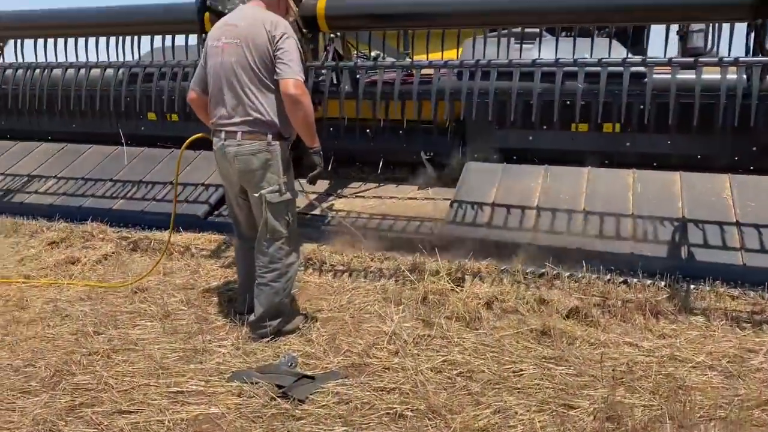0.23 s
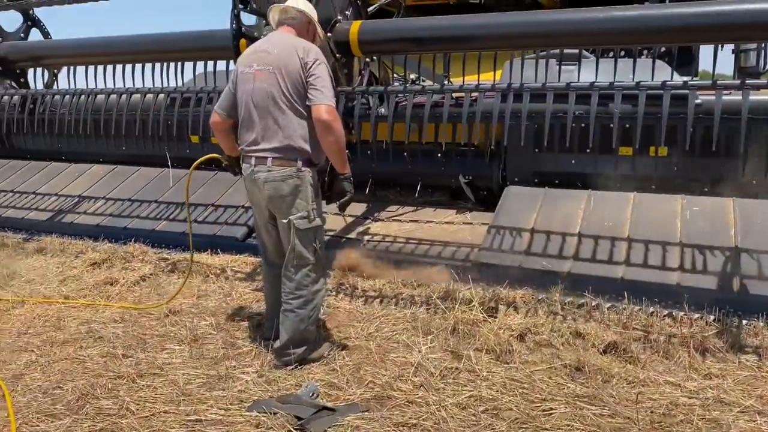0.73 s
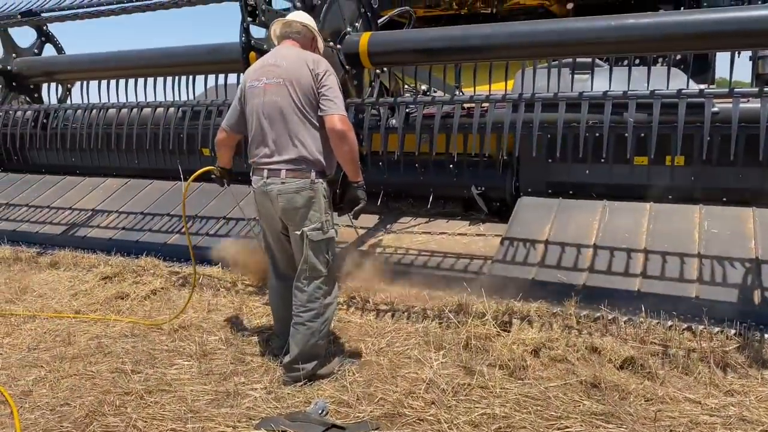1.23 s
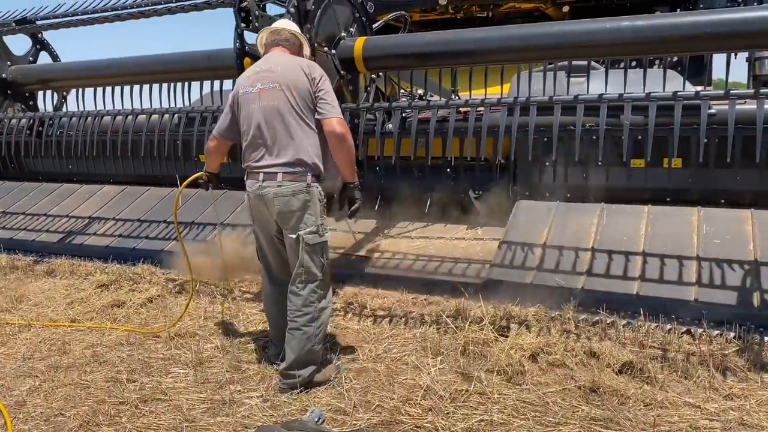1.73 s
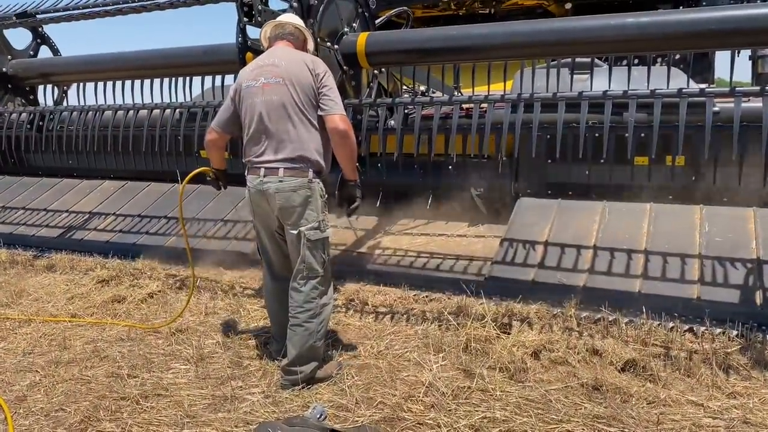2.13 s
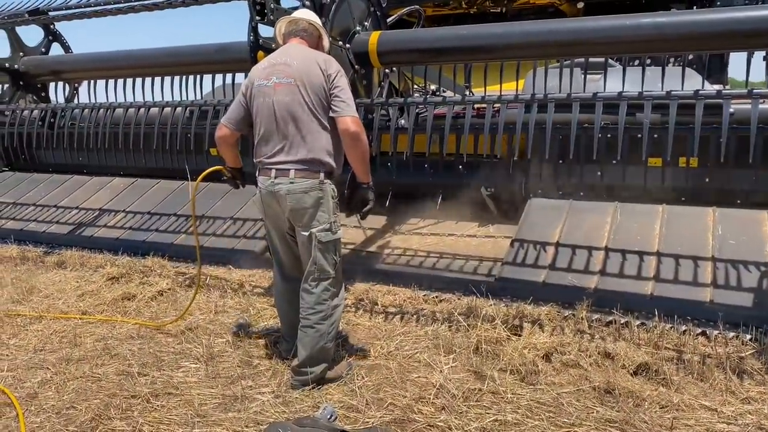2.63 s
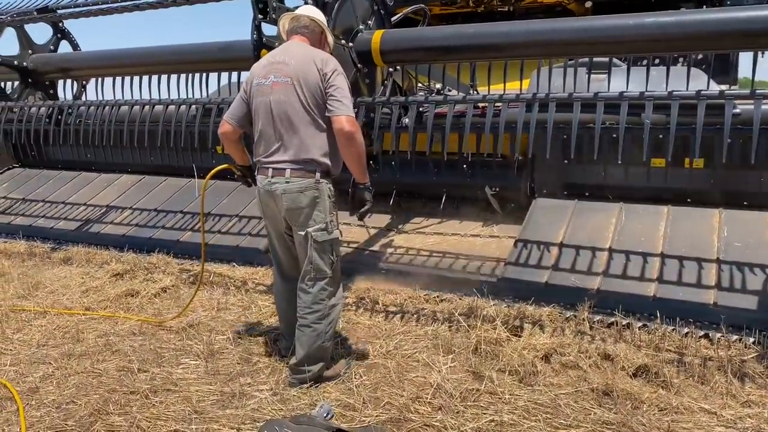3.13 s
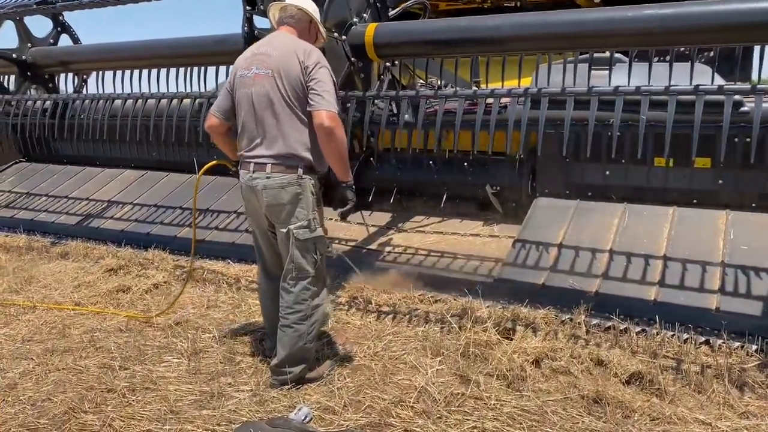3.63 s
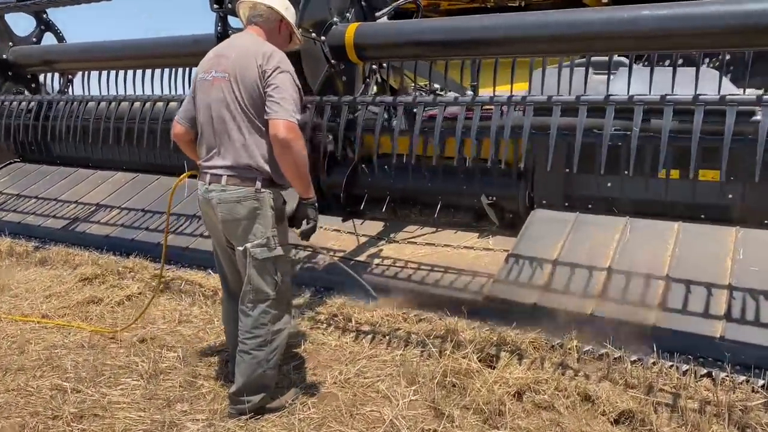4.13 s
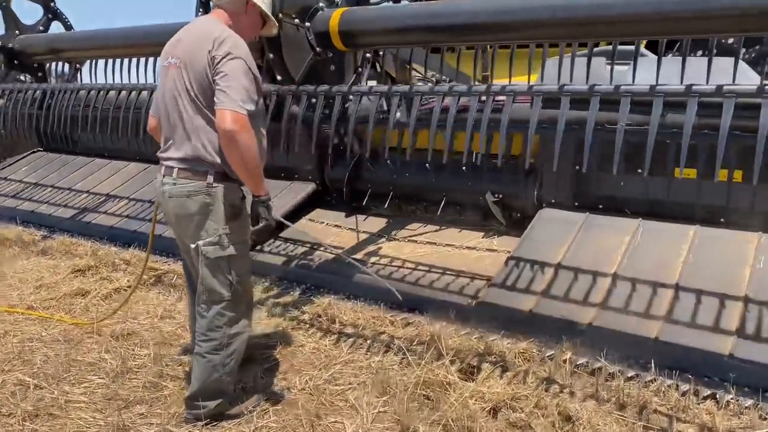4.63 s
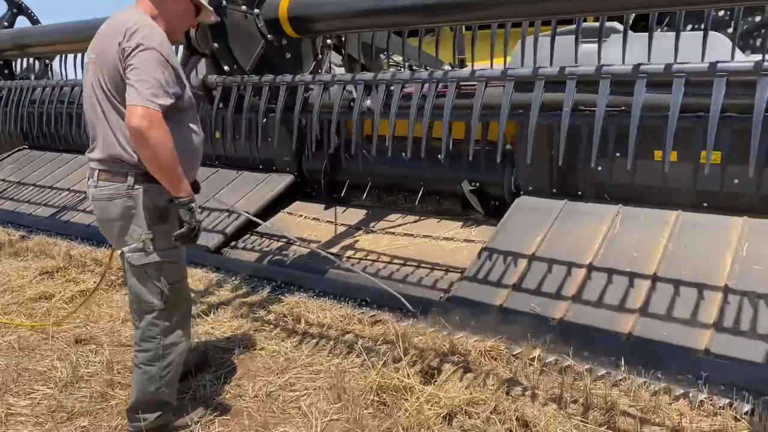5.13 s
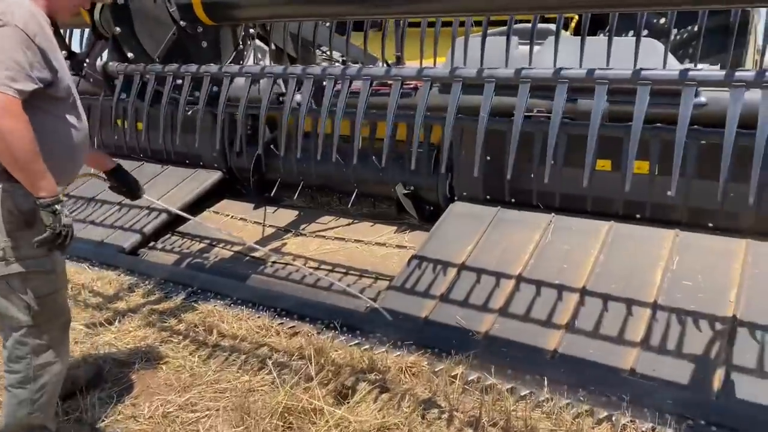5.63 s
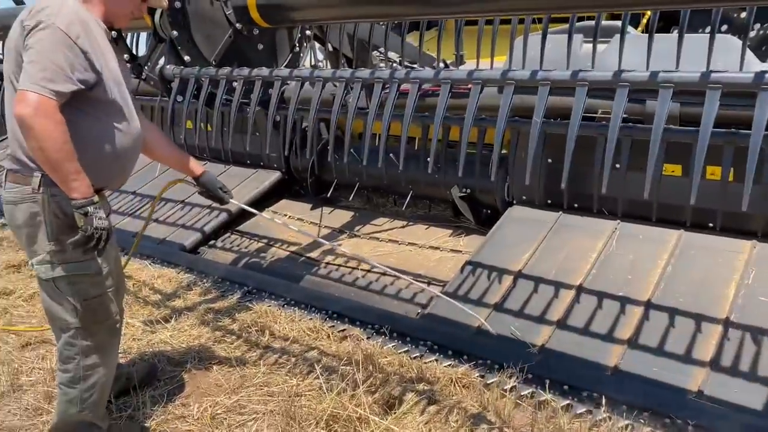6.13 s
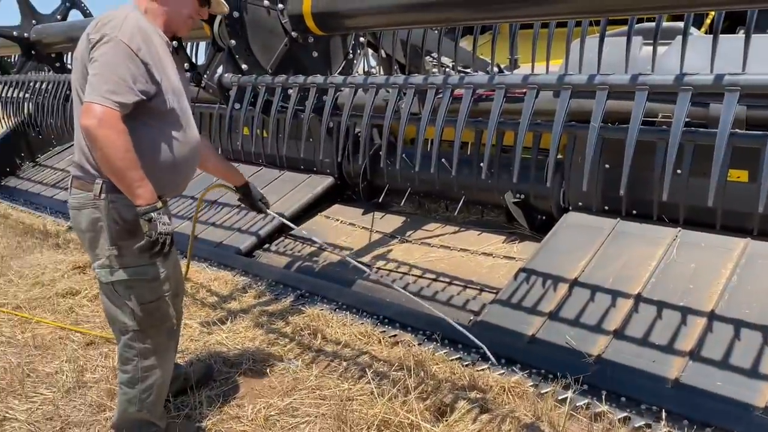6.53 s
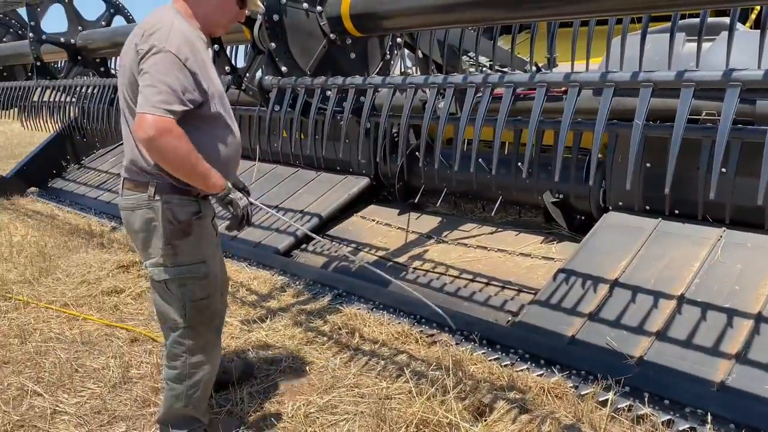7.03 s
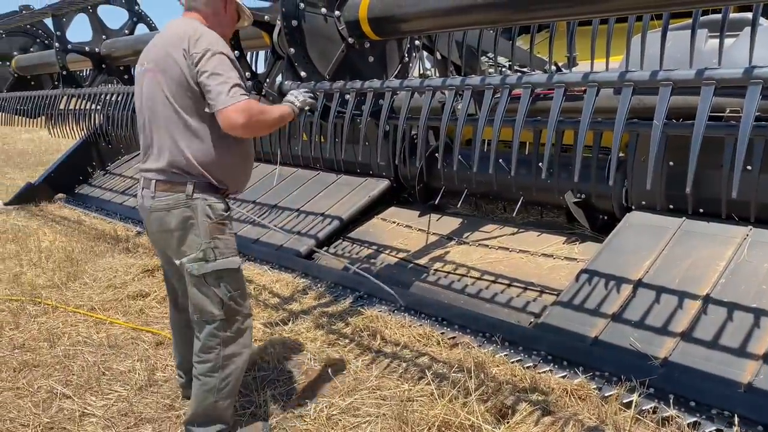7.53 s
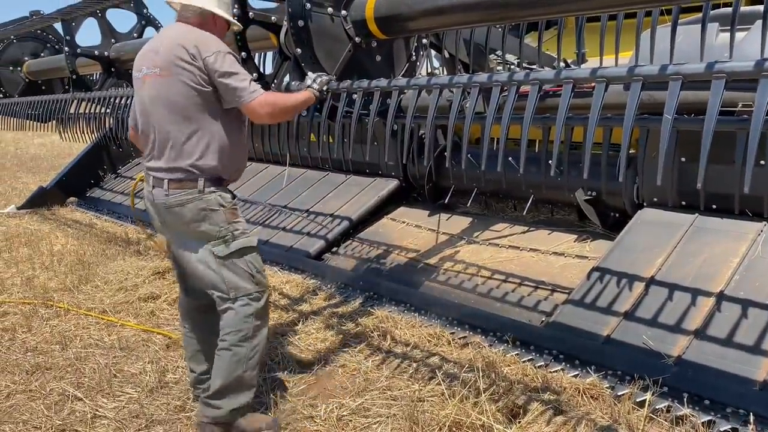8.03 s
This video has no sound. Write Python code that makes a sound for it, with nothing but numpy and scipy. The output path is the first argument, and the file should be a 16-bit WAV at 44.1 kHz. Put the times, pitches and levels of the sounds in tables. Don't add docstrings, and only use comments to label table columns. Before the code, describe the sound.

Outdoors in a field, a worker cleans a harvester header with compressed air. A bright hiss with a rougher roar beneath swells and dips as the nozzle sweeps over plates. A compressor drones to the left, fading after about three seconds. Wind buffets the small stereo microphone, and short spitting bursts come near the end.

```python
import sys
import numpy as np
from scipy import signal
from scipy.fft import rfft, irfft, next_fast_len
from scipy.io import wavfile
from scipy.ndimage import uniform_filter1d, map_coordinates

SR = 44100
rng = np.random.default_rng(int(sys.argv[2]) if len(sys.argv) > 2 else 0)


def digitize_waveform(pressure):
    field = np.atleast_2d(pressure).T
    bounded = np.clip(field, -1, 1)
    quanta = np.round(bounded * 32767).astype(np.int16)
    wavfile.write(sys.argv[1], SR, quanta)


def elevation(decibels):
    levels = np.asarray(decibels, float)
    return 10 ** (levels / 20)


N = 365148
USUAL_DB = -32


def unit(x):
    return x / np.sqrt(np.mean(x ** 2) + 1e-20)


def along(points, hz):
    f, v = np.transpose(points)
    return np.interp(np.log(hz + 1), np.log(f + 1), v)


def curves(rows):
    s, *cols = np.transpose(rows)
    return [np.interp(np.arange(N) / SR, s, c) for c in cols]


def swells(rows):
    s, half, *cols = np.transpose(rows)
    t = np.arange(0, N + 64, 64) / SR
    bells = np.exp(-((t[:, None] - s) / half) ** 2)
    return [np.interp(np.arange(N) / SR, t, bells @ c) for c in cols]


def wobble(rate):
    steps = np.arange(0, N + 64, 64)
    knots = rng.standard_normal(int(N * 200 / SR) + 8)
    coarse = map_coordinates(knots, [steps * min(rate, 200) / SR])
    return np.interp(np.arange(N), steps, coarse)


def filtered(x, response):
    m = next_fast_len(N + SR // 4)
    return irfft(rfft(x, m) * response(np.fft.rfftfreq(m, 1 / SR)), m)[..., :N]


def patchy(patchy_db):
    hz, t, z = signal.stft(rng.standard_normal((2, N)), SR, nperseg=512)
    field = rng.standard_normal(z.shape[1:])
    for axis in (0, 1):
        field = uniform_filter1d(field, size=8, axis=axis)
    at = np.minimum(np.round(t * SR).astype(int), N - 1)
    return hz[:, None], at, z * elevation(patchy_db * unit(field))


def sound(z):
    return signal.istft(z, nperseg=512)[1][:, :N]


def spread(pair, alike):
    turn = np.arccos(np.clip(alike, -1, 1)) / 2
    mid, side = pair[0] * np.cos(turn), pair[1] * np.sin(turn)
    return np.array([mid + side, mid - side])


def rush(spectrum, alike):
    def colour(hz):
        return spread(np.eye(2)[:, :, None], along(alike, hz)) * elevation(along(spectrum, hz))
    return filtered(sound(patchy(patchy_db=0.5)[2]), colour).sum(axis=1)


def jet_levels():
    # time in seconds, open hiss in dB, plate hiss against it in dB.
    aim = [(0, -33, -1.5), (.26, -30, 1.5), (.5, -28.5, -2.5), (.72, -42, -2), (1.1, -40, -5.5),
           (1.57, -37, -3.5), (2.09, -35.5, -3.5), (2.4, -35.5, -4.5), (2.95, -31.5, -1.8),
           (3.2, -25.5, -2), (3.79, -33.5, -1.1), (4.32, -28.5, -0.1), (5.1, -32.5, -5.5), (5.7, -28, -11),
           (6.1, -34.5, -3.5), (7.1, -32.5, -0.5), (7.63, -36, -1.5), (8.28, -40, -6.5)]
    # time and half length in seconds, level in dB.
    sweeps = [(.38, 0.068, 4), (.445, 0.037, -12), (.555, 0.012, -3), (.81, .05, 7.5), (.99, 0.025, 0.5),
              (1.53, 0.055, 2), (2.18, 0.035, -4), (2.28, 0.094, -6), (2.81, 0.061, -2), (3.227, 0.072, -4),
              (3.536, 0.039, 3.5), (3.74, 0.034, -4), (3.845, 0.041, 5.5), (3.97, 0.09, 4.5),
              (4.384, .03, -6.5), (4.465, 0.016, 1), (4.74, 0.037, 2.5), (5.28, 0.028, 4.5),
              (5.455, 0.061, 1), (5.57, 0.061, -4.5), (6.23, 0.074, 7.5), (6.39, .08, 4.5),
              (6.68, 0.073, 5), (7.14, 0.083, 2), (7.3, 0.032, 6), (7.43, 0.01, 0), (7.505, .022, 6.5),
              (7.585, 0.018, 6), (7.746, 0.051, 4.5), (7.812, .018, -2.5)]
    # time and half length in seconds, hiss in dB, roar in dB.
    strikes = [(.445, 0.028, 4, -2), (.62, 0.067, 6, 1), (.77, 0.038, -8, 0.5), (1.42, 0.059, 5.5, 0.5),
               (2.03, 0.067, 0.5, 2), (2.5, 0.2, 2.5, 2.5), (3.72, 0.041, -1.5, -0.5),
               (4.44, 0.024, 4.5, -1), (4.676, 0.014, 4, 1.5), (4.74, 0.015, -4, -3), (4.82, 0.012, 2, 2.5),
               (4.92, 0.1, 3, 3), (5.13, 0.051, 0.5, 5.5), (5.325, 0.032, -2.5, 7), (5.8, 0.04, 0, 2.5),
               (6.25, 0.039, -8, 0.5), (6.365, 0.077, 5.5, 8.5), (6.71, 0.037, 5, 7), (6.911, 0.034, 2, 3),
               (7.06, 0.048, -5.5, -3), (7.16, 0.024, 2.5, 4), (7.841, 0.022, -10.5, -4),
               (7.89, .015, 1.5, 3.5), (8.2, 0.028, 1, 5)]
    # time in seconds, share of the turn.
    facing = [
        (0, 0),
        (4.3, 0.086),
        (4.7, 0.21),
        (5.7, 0.3),
        (6, 0.71),
        (8.28, 0.88),
    ]
    open_db, plate_db = curves(aim)
    sweep_db, = swells(sweeps)
    strike_db, deep_db = swells(strikes)
    turn, = curves(facing)
    top_db = open_db + sweep_db
    upper_db = plate_db + strike_db - (1 - 0.62) * sweep_db
    roar_db = -36 + 0.57 * (open_db - USUAL_DB) + 0.32 * sweep_db + deep_db - 8.5 * turn - top_db
    middle_db = -0.5 + 0.11 * plate_db - (1 - 0.93) * sweep_db - 0.5 * turn
    middle_hz = 10320 + (11640 - 10320) * turn
    roar_drop_hz = 110 * np.clip(deep_db - strike_db, 0, 9)
    return top_db, upper_db, roar_db, middle_db, middle_hz, roar_drop_hz


def edge_spits():
    # start in seconds, peak in dB, decay in seconds, rise in seconds.
    spits = [(4.82, -24, 0.012, 0.0026), (6.1786, -31, 0.0042, 0.0016), (6.9696, -26, 0.0068, 0.0012),
             (7.0696, -21, 0.012, 0.0025), (7.118, -23.5, 0.01, 0.0013), (7.288, -10.5, 0.018, 0.0019),
             (7.392, -18.5, 0.008, 0.002), (7.4327, -18.5, 0.0057, 0.0016), (7.5094, -35, 0.0081, 0.0018),
             (7.5662, -14, 0.0083, 0.0024), (7.7346, -6, 0.0015, 0.0066), (7.7813, -17, 0.0055, 0.0028)]
    t = np.arange(N) / SR
    flare = np.zeros(N)
    for s, peak_db, decay, rise in spits:
        fall = np.where(t > s + rise, decay, rise / 2)
        flare += elevation(peak_db - 5.5) * np.exp(-abs(t - s - rise) / fall)
    return flare


def jet():
    # centre in Hz, width in Hz.
    humps = [(14420, 1230), (6446, 1375), (3695, 2170)]
    # centre in Hz, width in Hz, share of power lost.
    ground_dips = [(2980, 550, 0.3), (5080, 350, 0.31)]
    # frequency in Hz, phase by which left leads in radians.
    lead_points = [(0, 0), (2500, .1), (4200, .4), (5600, 1.65), (7600, 2.5), (9600, 3.14), (11700, 3.9),
                   (14000, 4.75), (16000, 5.5)]
    # frequency in Hz, left-right likeness (0 to 1).
    likeness = [(1000, 0.94), (2100, 0.61), (2900, 0.43), (4100, 0.61), (5000, 0.42), (7000, 0.91),
                (8500, .93), (10500, .93), (13000, 0.92), (16000, 0.6)]
    facing_s = (2.6, 5.1)
    top_db, upper_db, roar_db, middle_db, middle_hz, roar_drop_hz = jet_levels()
    hz, at, z = patchy(patchy_db=1.5)

    def hump(centre, width):
        return np.exp(-((hz - centre) / width) ** 2)

    *highs, (roar_hz, roar_width_hz) = humps
    shapes = [*highs, (roar_hz - roar_drop_hz[at], roar_width_hz), (middle_hz[at], 1900)]
    levels_db = [0, upper_db + 0.58, roar_db, middle_db]
    power = 0
    for (centre, width), db in zip(shapes, levels_db):
        level_db = (db + 0.26 * wobble(8.9))[at]
        power = power + elevation(2.157 * level_db) * hump(centre, width)
    power = power * (1 - sum(lost * hump(centre, width) for centre, width, lost in ground_dips))
    low_cut = hz ** 2 / (hz ** 2 + 800 ** 2)
    low_alike = -0.02 + 0.18 * np.interp(at / SR, facing_s, [0, 1])
    z = spread(z * np.sqrt(power) * low_cut, along(likeness, hz) + low_alike * (hz < 4500))
    lead = np.exp(.5j * along(lead_points, hz))
    shake_db = 0.39 * wobble(19) + 1.0 * wobble(60)
    return sound(z * [lead, lead.conj()]) * elevation(shake_db) * (elevation(top_db + 12.5) + edge_spits())


def unsteady(cycles, db):
    waver = wobble(11)
    return elevation(db + 2.0 * waver) * np.sin(2 * np.pi * (cycles + rng.random() + .09 * waver))


def compressor():
    # multiple of the shaft rate, level in dB.
    orders = [(2, -11), (13, -12.5), (23, -15.5), (24, -6.5), (25, -10), (28, -13), (29, -2), (30, -21.5),
              (33, -12), (34, -4.5), (35, 0.5), (36, 3.5), (37, -1), (39, -9), (42, -3.5), (45, -13),
              (47, -6), (72, -9.5)]
    # frequency in Hz, casing noise in dB per Hz.
    casing_colour = [(100, -11.5), (400, -10.5), (720, -14.5), (820, -4.5), (950, -9), (1040, 3),
                     (1130, -8), (1500, -12), (2030, -10), (2600, -18.5), (5000, -32)]
    # frequency in Hz, left over right in dB.
    pan = [(100, 2.5), (400, 8), (750, 16), (1030, 13.5), (1500, 12.5), (2200, 7)]
    # time in seconds, sound path to the compressor in metres.
    walk = [
        (0, 15),
        (.5, 9.3),
        (3.3, 9.15),
        (4, 17.8),
        (5.7, 28),
        (6.9, 59),
        (8.28, 44),
    ]
    path_m, = curves(walk)
    shaft_hz = 27.8
    turns = np.cumsum(shaft_hz * (1 + 0.00093 * wobble(3.08))) / SR
    tones = sum(unsteady(round(k) * turns, db) for k, db in orders)
    whine_cycles = np.cumsum(1050 + 6 * wobble(12)) / SR
    whine = elevation(-2.5 + 1.6 * wobble(30)) * np.sin(2 * np.pi * whine_cycles)
    angle = 2 * np.pi * turns
    throb = 1 + 0.26 * np.cos(angle) + 0.14 * np.cos(3 * angle) + 0.047 * np.cos(4 * angle)
    alike = [(100, 1.0), (450, 0.97), (700, -1.7), (1300, -0.038), (2000, 0.92)]  # (Hz, likeness)
    casing = unit(throb * rush(casing_colour, alike))
    drone = elevation(-4.0) * (tones + whine) + elevation(5.0) * casing
    panned = filtered(drone, lambda hz: elevation(np.outer([.3, -.7], along(pan, hz))))
    return elevation(-40) * 7.3 / path_m * panned


def wind():
    # time in seconds, wind strength in dB.
    gale = [(0, -32.5), (.45, -31.5), (.6, -34.5), (.82, -37.5), (1.0, -35.5), (1.65, -34.5), (2.0, -34),
            (2.6, -33.5), (3.4, -32.5), (3.95, -37), (4.55, -39), (4.9, -35), (5.5, -38.5), (6.3, -37.5),
            (6.85, -39), (6.97, -44), (7.7, -46.5), (8.28, -41.5)]
    # time and half length in seconds, thump in dB, flutter in dB.
    gusts = [(0.188, 0.085, 3.5, 3.5), (0.406, 0.031, 0, 1), (0.895, 0.15, 4.5, 6),
             (1.018, 0.019, 3.5, -1.5), (1.131, 0.024, 4, 5.5), (1.246, 0.056, 8.5, 5),
             (1.388, 0.046, 6, 5), (1.452, 0.029, 3.5, 2.3), (1.769, 0.066, 5, 3), (1.921, 0.091, 4, 7),
             (2.345, 0.17, 4.5, 1), (2.777, 0.21, 2.5, 1), (3.109, 0.0097, 4.5, -18),
             (3.382, 0.069, -1.5, 2), (3.51, 0.047, 5, 5), (3.779, 0.083, 6, 4.5), (3.9, 0.067, 5.5, -0.5),
             (4.11, 0.048, 6, 5), (4.264, 0.065, 6.5, 2), (4.799, 0.027, -6, 5.5), (5.282, 0.032, 4.5, 3),
             (5.36, 0.05, 9, -1.5), (5.71, 0.11, 1.5, 0.0), (6.187, 0.074, 3, -0.5), (6.56, 0.02, 3.5, 4.5),
             (7.094, 0.014, 6, 7.5), (7.273, 0.021, 13.5, 8), (7.793, 0.024, 12, 10),
             (7.95, 0.074, 12.5, 11), (8.157, 0.078, 9.5, 10.5)]
    # frequency in Hz, density in dB per Hz.
    thump_colour = [(20, -39), (38, -12.5), (55, -0.5), (110, -7), (200, -20.5), (400, -51)]
    flutter_colour = [(60, -38), (130, 0.5), (250, -0.5), (500, -6.5), (900, -15), (1600, -33)]
    # frequency in Hz, left-right likeness (0 to 1).
    thump_alike = [(50, .997), (90, .95), (150, .97)]
    strength_db = curves(gale)[0] - USUAL_DB
    gust_thump_db, gust_flutter_db = swells(gusts)
    thump_db = -37.5 + 1.25 * (strength_db + gust_thump_db)
    flutter_db = -32.5 + 1.34 * (strength_db + gust_flutter_db)
    lumps_db = 1.0 * wobble(24)
    thump = unit(elevation(lumps_db * 0.17) * rush(thump_colour, thump_alike))
    flutter_lumps = elevation(lumps_db + 2.3 * wobble(45))
    flutter = unit(flutter_lumps * rush(flutter_colour, [(150, 0.63), (600, 0.31)]))
    return elevation(thump_db + 1.24) * thump + elevation(flutter_db + [[-.3], [.8]]) * flutter


def hollow(blown, centre_hz, width_hz, rest_db):
    strength, = swells([(s, half, elevation(db)) for s, half, db in blown])
    ring = filtered(rng.standard_normal(N), lambda hz: np.exp(-((hz - centre_hz) / width_hz) ** 2))
    return (strength + elevation(rest_db)) * elevation(-3.5) * unit(ring)


def boxy_cavity():
    # time and half length in seconds, level in dB.
    crossings = [(.32, 0.096, -45), (1.08, 0.14, -35.5), (1.89, 0.088, -36), (2.75, 0.28, -41.5),
                 (3.602, 0.12, -37.5), (4.343, 0.18, -45.5), (4.6, 0.12, -46), (4.913, 0.057, -37.5),
                 (5.784, 0.24, -45), (6.42, 0.16, -40.5), (7.568, 0.24, -44.5)]
    return hollow(crossings, centre_hz=355, width_hz=35, rest_db=-60)


def small_gap():
    # time and half length in seconds, level in dB.
    crossings = [
        (4.33, .05, -44),
        (5.33, .04, -46),
        (5.53, .05, -43),
        (5.73, .03, -45),
        (6.27, .06, -45),
    ]
    return hollow(crossings, centre_hz=787, width_hz=90, rest_db=-69)


def scene():
    return jet() + compressor() + wind() + boxy_cavity() + small_gap()


def masked(x):
    size, start = 1024, 1024 - 312
    k = np.arange(2 * size) + .5
    window = np.sin(np.pi * k / (2 * size))
    basis = window[:, None] * np.cos(np.pi / size * np.outer(k + size / 2, k[:size]))
    pair = np.pad([x[0] + x[1], x[0] - x[1]], ((0, 0), (size + start, 3 * size)))
    blocks = pair[:, :pair.shape[1] // size * size].reshape(2, -1, size)
    lines = np.concatenate([blocks[:, :-1], blocks[:, 1:]], axis=2) @ basis
    edges = np.r_[0, 64:160:12, 160:320:20, 320:size:16]
    widths = np.diff(np.r_[edges, size])
    power = np.add.reduceat(lines ** 2, edges, axis=2)
    frame_s = (np.arange(lines.shape[1]) * size - start) / SR
    sum_gap_db = np.interp(frame_s, [0, 4.5], [4.4, 6.6]) + 24 * (abs(frame_s - 7.53) < .008)
    gaps_db = np.array([sum_gap_db, 0 * sum_gap_db + 7.0])
    judged = uniform_filter1d(power, size=2, axis=2)
    keep = judged * elevation(2 * gaps_db)[..., None] > judged[::-1]
    keep[:, :, 0] = True
    masking = uniform_filter1d(power.max(axis=0) / widths, size=15, axis=1)
    step = np.repeat(.6 * np.sqrt(masking) * (edges > 0) + 1e-9, widths, axis=1)
    lines = step * np.round(lines / step) * np.repeat(keep, widths, axis=2)
    halves = lines @ basis.T / size
    overlapped = halves[:, 1:, :size] + halves[:, :-1, size:]
    mid, side = overlapped.reshape(2, -1)[:, start:start + N]
    return np.array([mid + side, mid - side])


def roll_off(x):
    return signal.sosfilt(signal.butter(12, 16720, fs=SR, output="sos"), x)


def record(dry):
    mix = masked(filtered(dry, lambda hz: hz < 15850))
    return roll_off(mix)


dry = scene()
out = record(dry)
digitize_waveform(out)
```